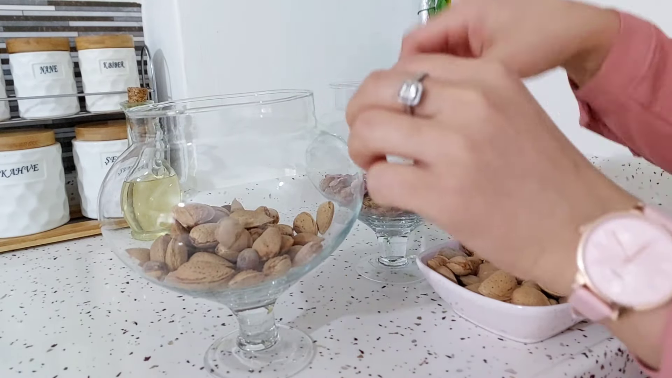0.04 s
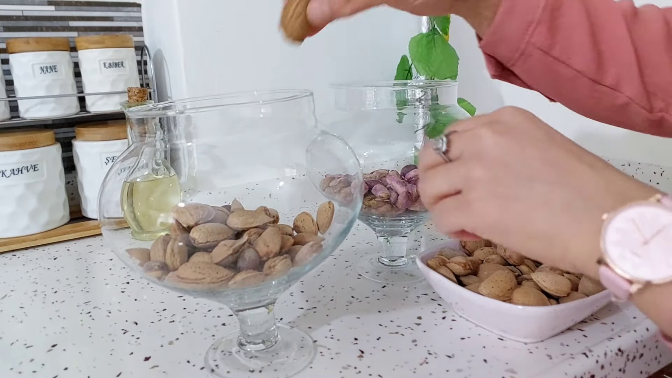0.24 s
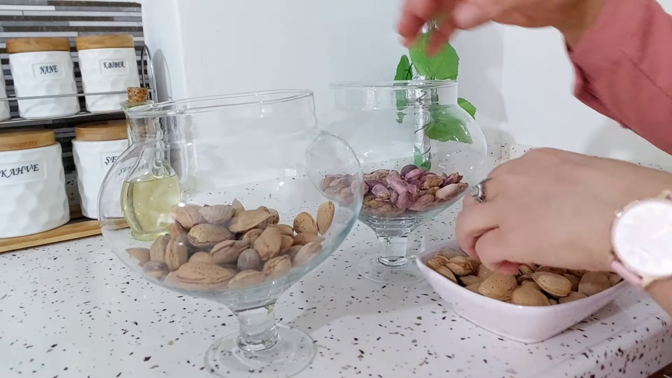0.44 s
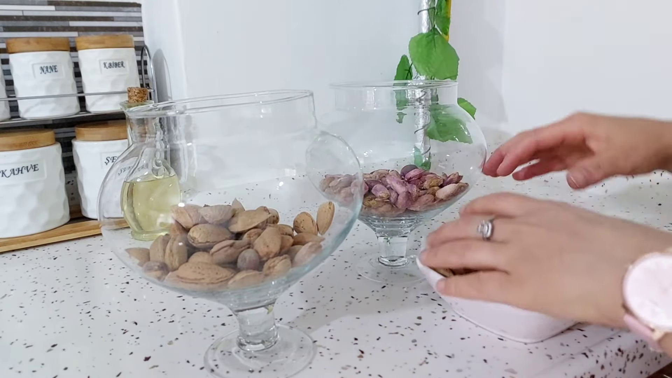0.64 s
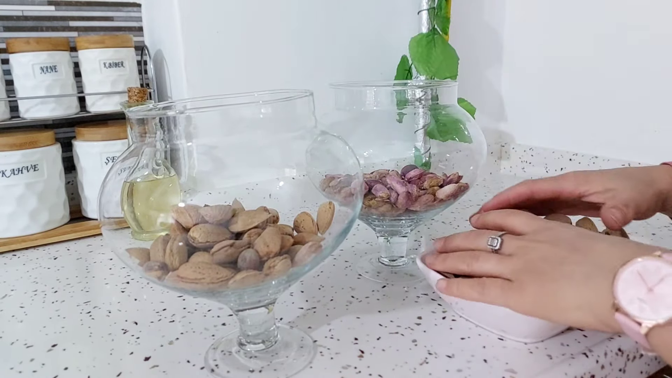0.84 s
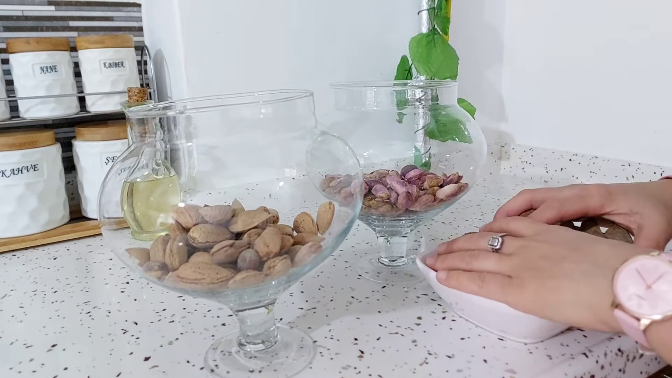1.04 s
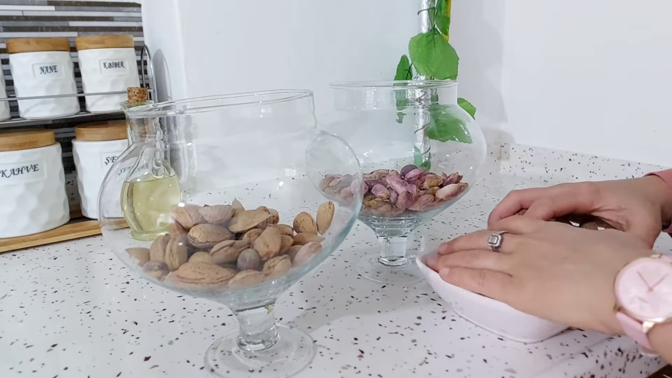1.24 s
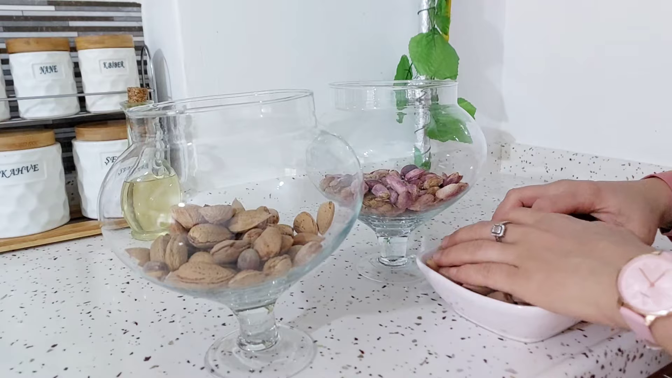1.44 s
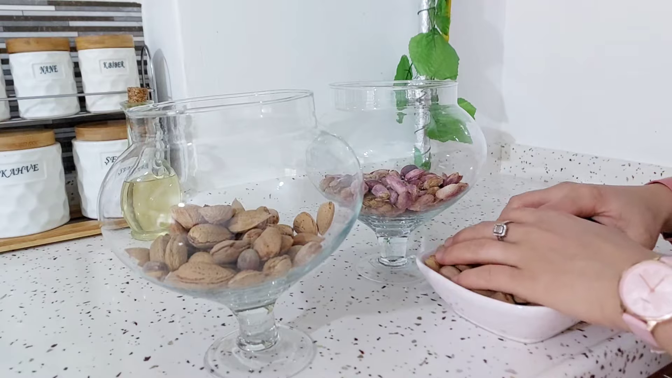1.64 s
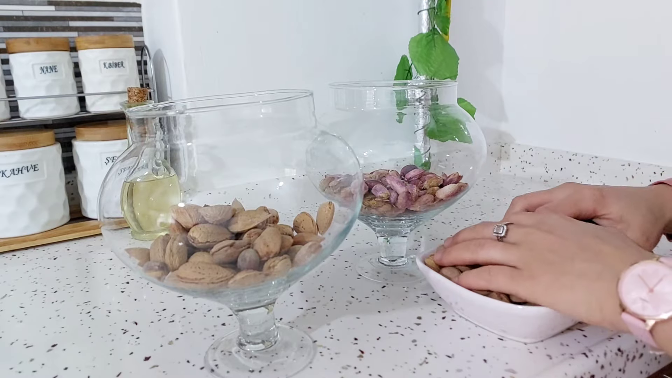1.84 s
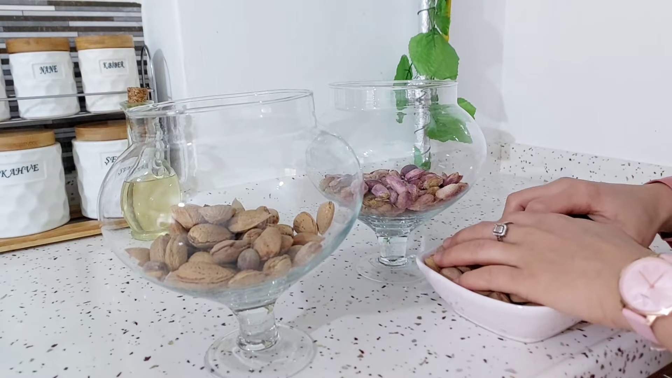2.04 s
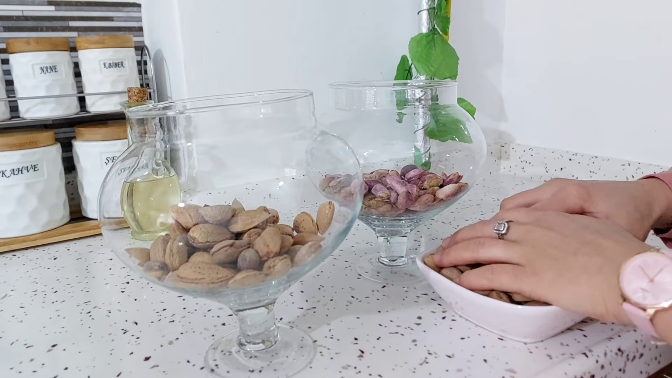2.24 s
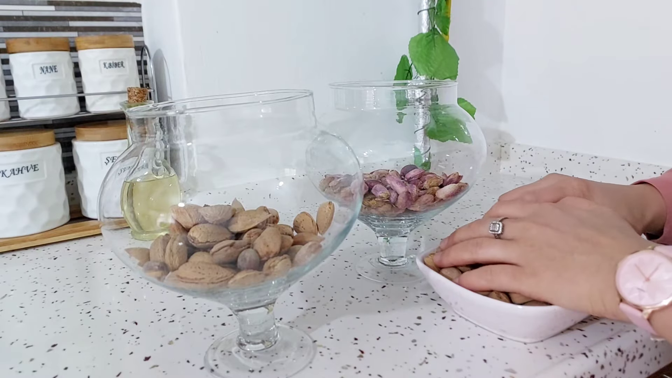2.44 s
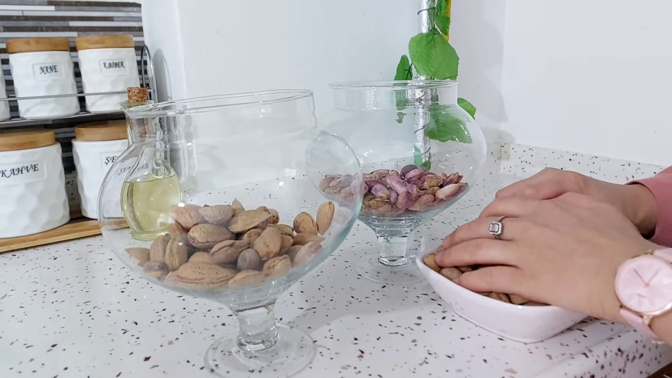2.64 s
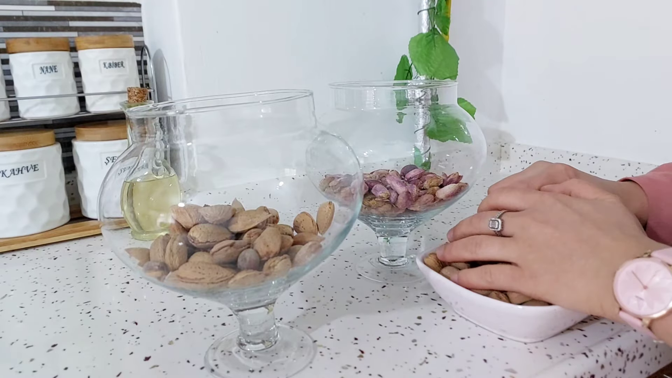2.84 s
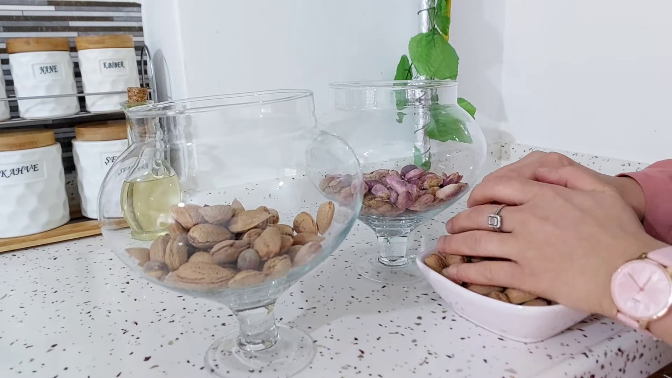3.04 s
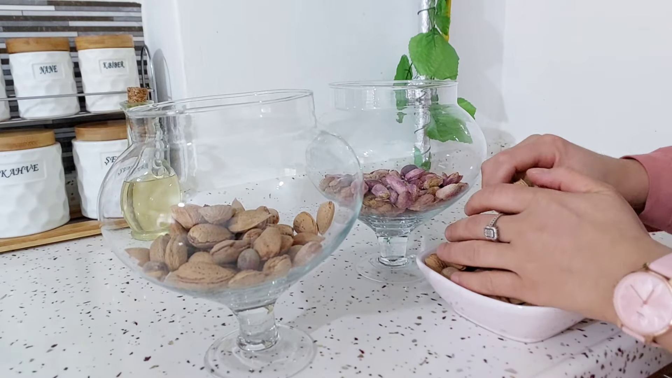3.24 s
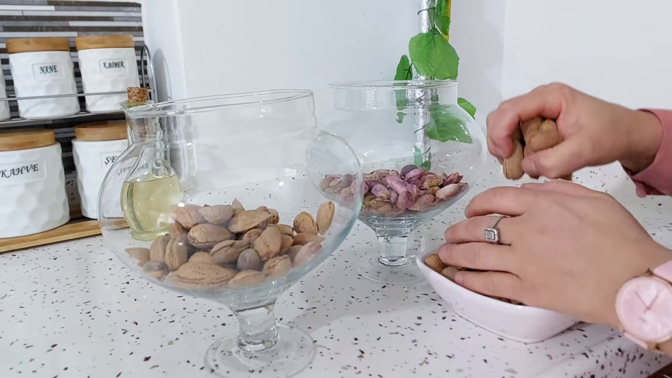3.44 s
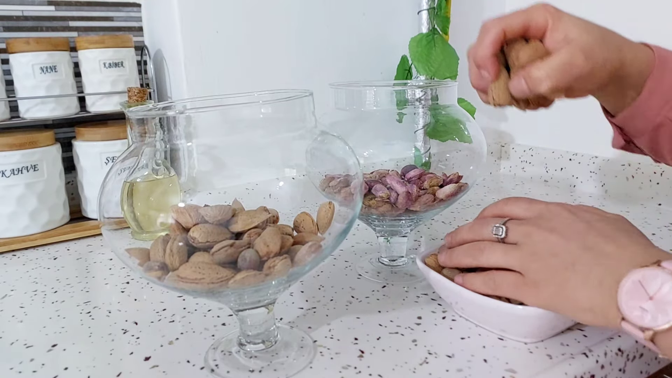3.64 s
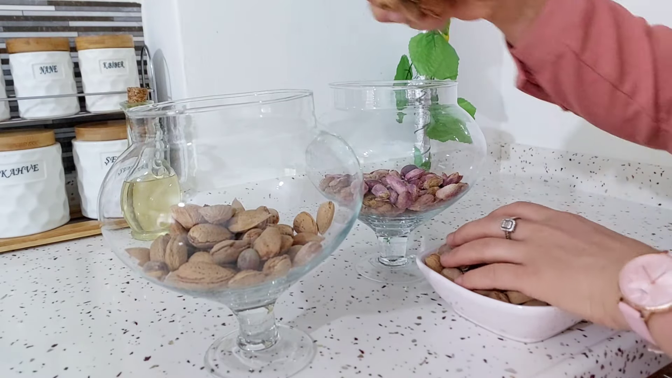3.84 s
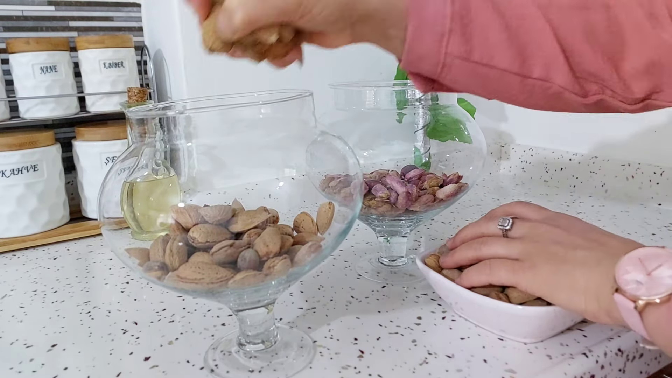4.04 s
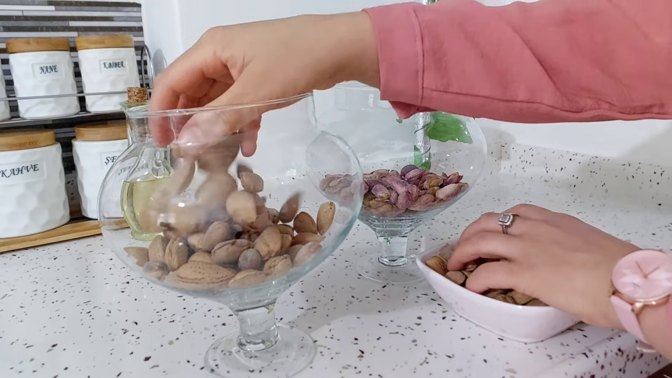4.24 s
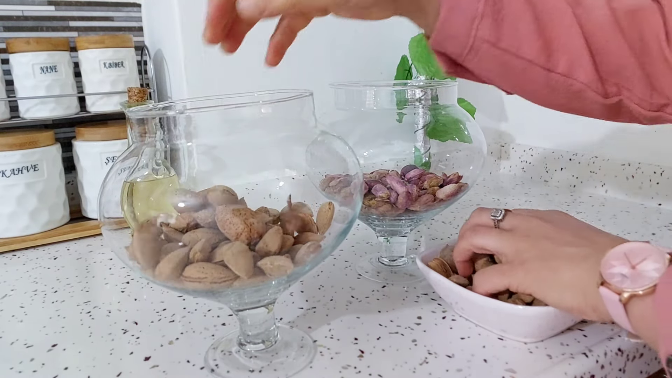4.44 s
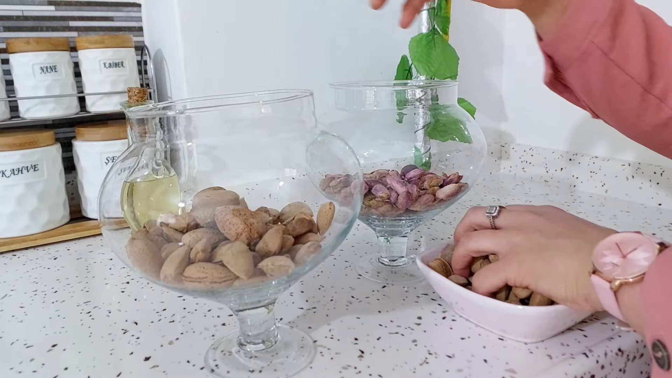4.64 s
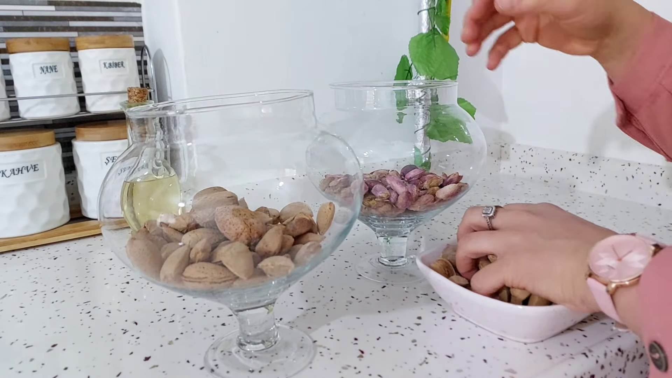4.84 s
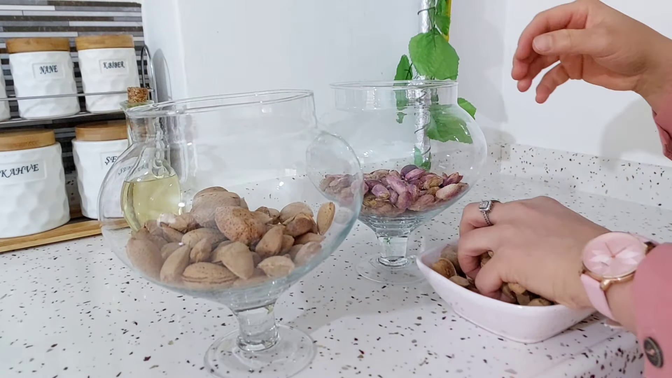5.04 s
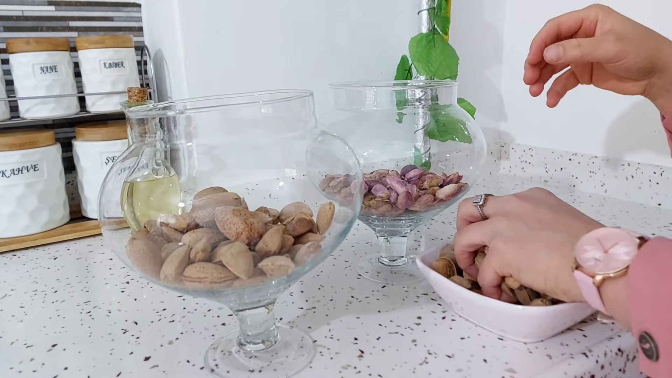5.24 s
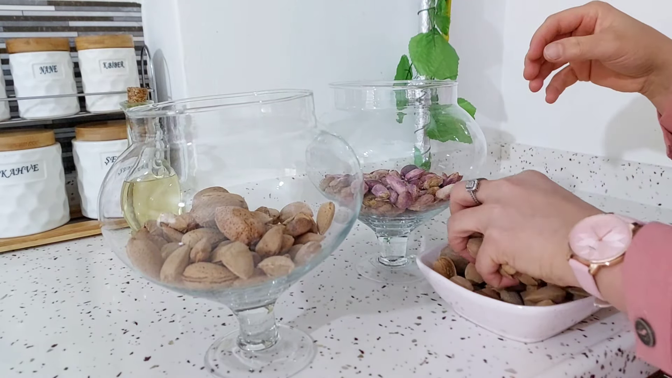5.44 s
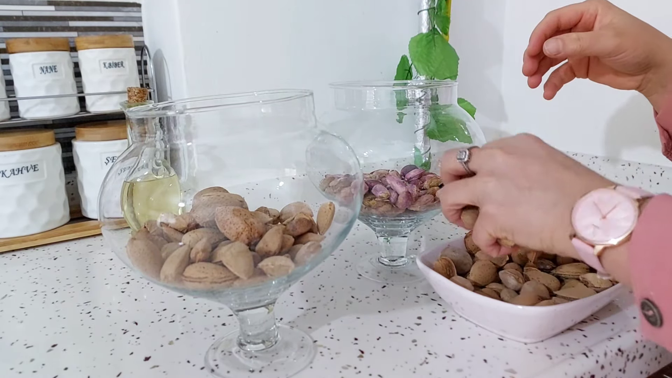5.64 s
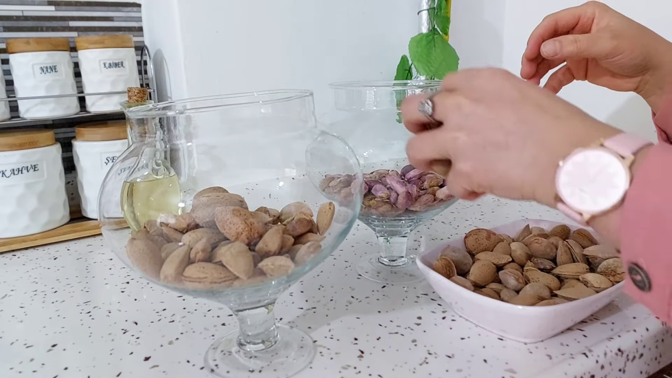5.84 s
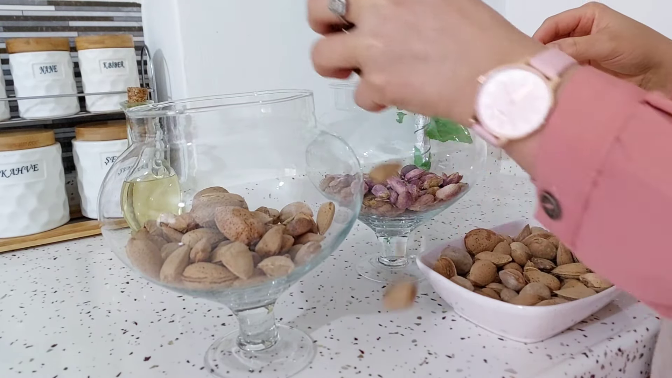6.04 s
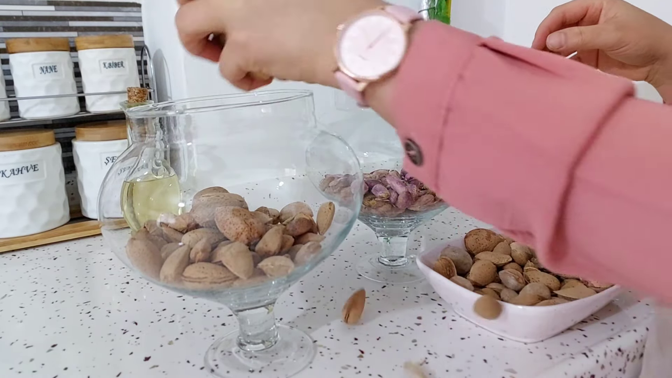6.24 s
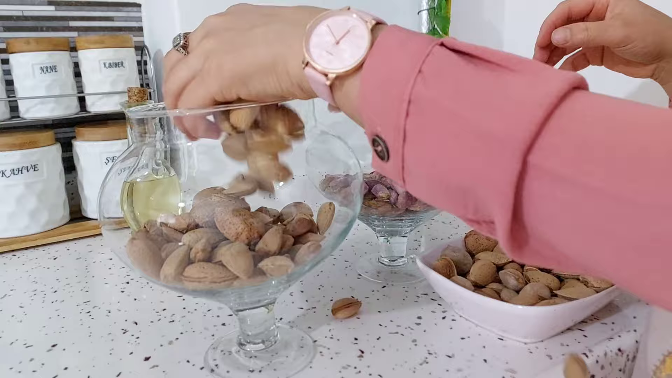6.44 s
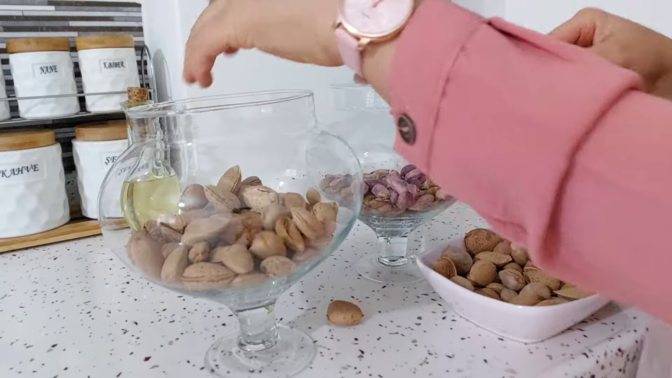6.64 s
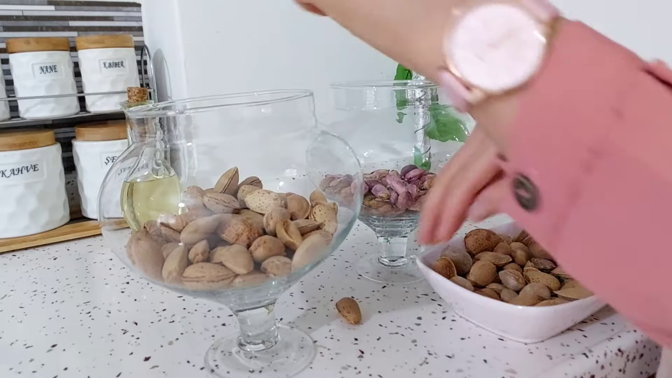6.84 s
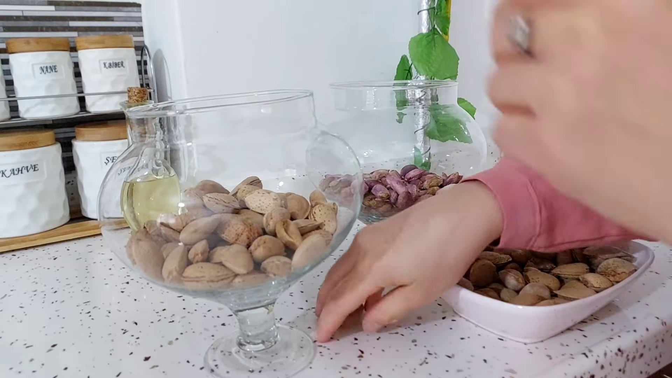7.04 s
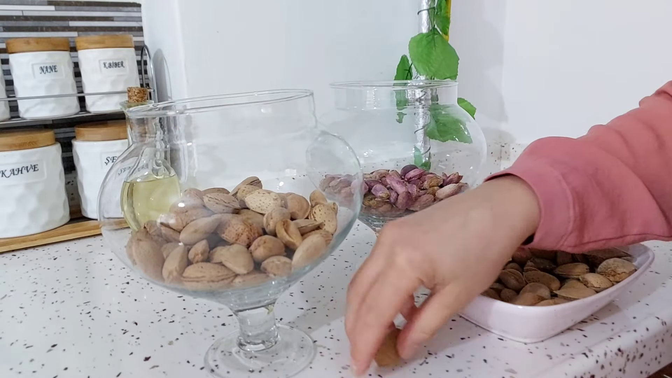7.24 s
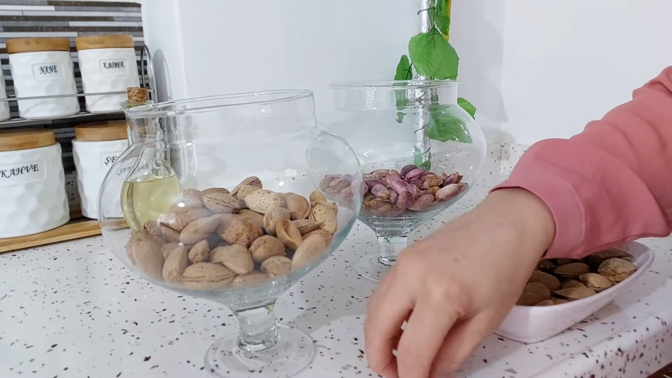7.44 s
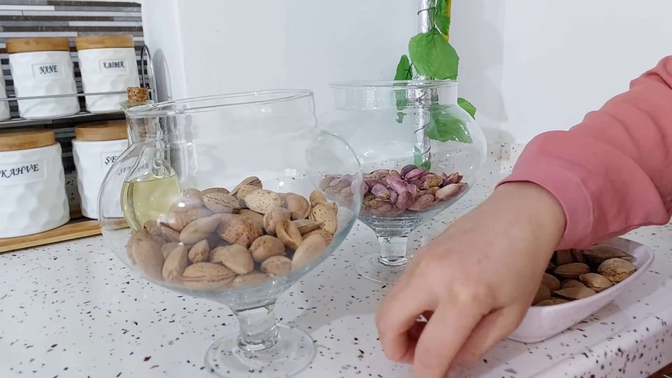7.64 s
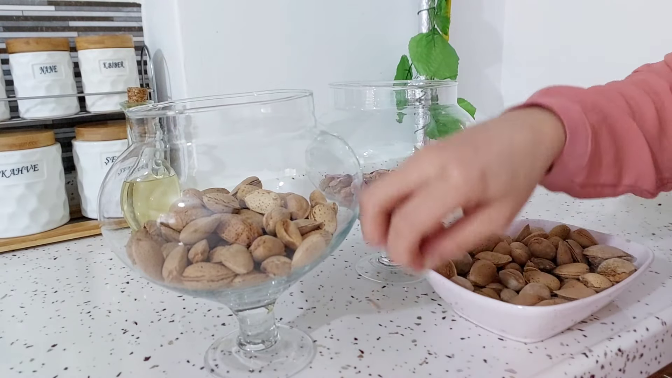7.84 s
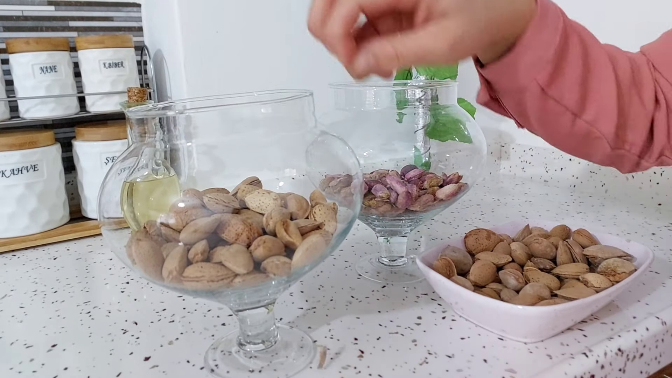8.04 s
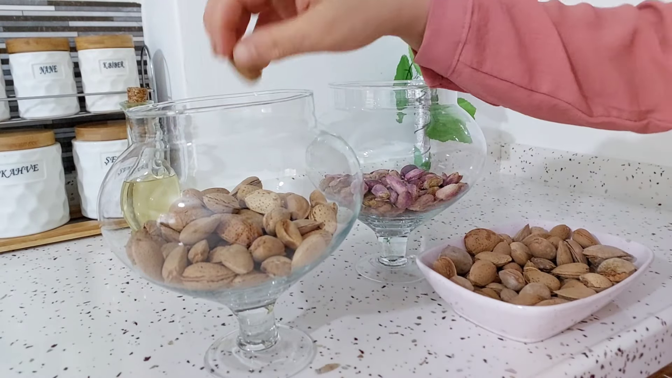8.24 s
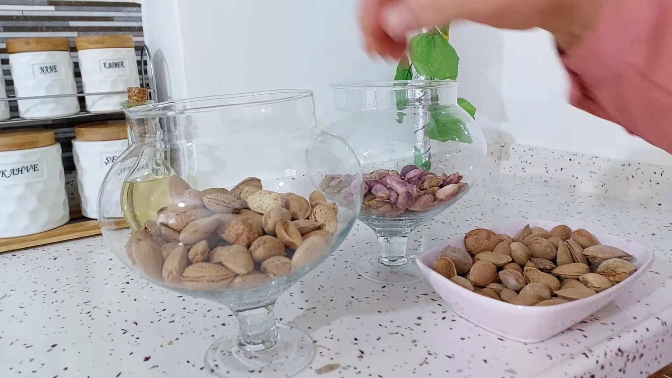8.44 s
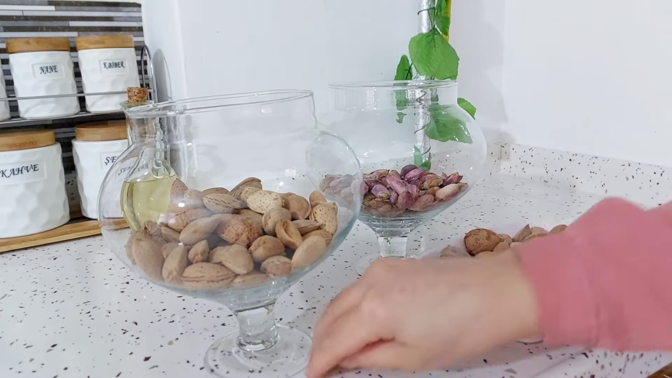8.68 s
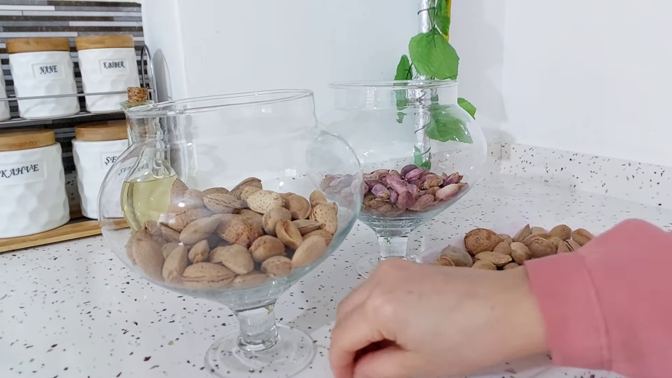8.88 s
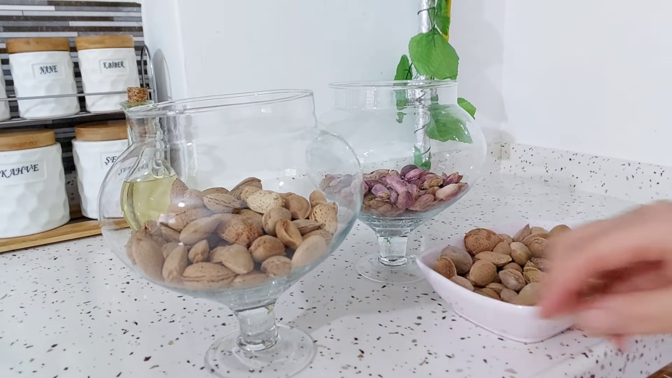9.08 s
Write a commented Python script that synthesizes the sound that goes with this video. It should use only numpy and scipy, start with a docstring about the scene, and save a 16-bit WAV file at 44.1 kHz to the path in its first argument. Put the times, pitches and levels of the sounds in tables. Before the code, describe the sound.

A quiet small kitchen, heard closely in stereo, with low rumble, a faint wavering appliance hum and short bright echoes. At about 0.4 s two almonds click onto the heap in a glass jar with a hollow thud. From 0.8 to 3.5 s a hand softly stirs a china bowl: grainy rustling, small slips, woody knocks near 1.6 and 2.5 s, slight china ringing. At 4.2 s a handful rushes into the jar, clattering, thudding and clinking for about half a second. Light rummaging returns from 4.8 to 5.7 s. At 6.0 s glass clinks and strays crack on stone; a shorter pour lands at 6.5 s, with sharp dry bounces, strongest around 6.8 s, thinning until 7.4 s. Faint ticks and a soft hand bump near 7.9 s precede a few almonds dropping at 8.35 s, a bright glass clink at 8.5 s, and a faint sleeve swish around 8.8 s.

```python
"""Almonds in their shells drop by the handful on a heap in a footed glass jar: clicks over the jar's hollow thuds.
Shells clink on the glass, which sings in dying modes; strays crack and bounce on the stone counter and the floor.
In a china bowl a hand grinds, knocks and slips the almonds, and the china rings. A palm, a sleeve and soft bumps
are shaped noise. A small kitchen answers with echoes and a tail, over low rumble and a wavering hum."""
import sys
import numpy as np
from scipy import signal
from scipy.fft import rfft, irfft
from scipy.io import wavfile

SR = 44100
rng = np.random.default_rng(int(sys.argv[2]) if len(sys.argv) > 2 else 0)


def waveform_to_disk(signal):
    """Save audio, clipped to [-1, 1], as 16-bit WAV at the path in sys.argv[1]."""
    frames = np.transpose(np.atleast_2d(signal))
    scaled = np.clip(frames, -1, 1) * 32767
    samples = np.round(scaled).astype(np.int16)
    wavfile.write(sys.argv[1], SR, samples)


N = 401751
JAR_LAG, BOWL_LAG = -6, 5  # samples by which the left microphone hears each place later

# colour of shell on shell: f/Hz, level/dB
SHELL_COLOUR = [(100, -21.5), (400, 0), (2500, -5.5), (5500, -3), (8300, -12), (11000, -8.5), (16000, -14)]
# handfuls let go over the jar: first contact t/s, build-up/s, rattle level before trims/dB, heap shifting/s
POURS = [(4.211, 0.012, -34, 0.5), (6.48, 0.078, -36, 0.15)]


def heap(settle_db=-6, rumble_db=-5, off_pitch_db=-8, hollow_db=-5, clatter_db=-7, shell_hz=4600):
    """Almonds land on almonds: shells click and ring, and the loaded jar gives a hollow thud."""
    # almonds landing on the heap: t/s, shell click level/dB, thud level/dB, thud pitch f/Hz
    landings = [(0.1515, -60.5, -48.5, 500), (0.3932, -35.5, -31.5, 530), (0.397, -40, -35.5, 308),
                (4.2155, -41, -34, 347), (4.2325, -32, -26, 378), (4.2425, -32, -42, 383),
                (4.3126, -31.5, -38, 398), (4.3317, -35.5, -28.5, 647), (4.378, -28, -45.5, 445),
                (4.445, -34.5, -36, 493), (4.5016, -37, -37, 660), (6.556, -52, -29.5, 444),
                (6.612, -37, -34, 308), (8.3445, -47, -34, 497), (8.3682, -41.5, -38, 308),
                (8.734, -55.5, -55.5, 473)]
    # modes of the almond-filled jar: f/Hz, level/dB, t60/s
    jar_modes = [(141, -3, 0.044), (307.3, -0.5, 0.09), (383.7, 0.5, 0.055), (446, 6, 0.042),
                 (483, 6.5, 0.042), (644.5, -5.5, 0.12), (751.6, -7, 0.069), (1284, -14.5, 0.19)]
    shells, thuds = np.zeros((2, N)), np.zeros((2, N))
    shell = colour(SHELL_COLOUR)
    for s, shell_db, thud_db, hz in landings:
        # the modes within half an octave of the thud's pitch are favoured
        blow = [(hz / np.sqrt(2), off_pitch_db), (hz, 0), (hz * np.sqrt(2), off_pitch_db)]
        snap = click(shell, JAR_LAG, snap_s=0.00058, rattle_s=0.011, rattle_db=-1.0)
        add(shells, s, amp(shell_db) * snap)
        add(shells, s, amp(shell_db + hollow_db) * ring(husk(shell_hz), JAR_LAG, detune=0.2))
        add(thuds, s, amp(thud_db) * ring(jar_modes, JAR_LAG, detune=0.02, tilt=blow))
    rattle = pouring() * grains(530, 11.0, JAR_LAG)
    body = ring(jar_modes, JAR_LAG)
    shells += amp(settle_db) * convolve(rattle, shell)  # the crowd of smaller contacts
    shells += amp(clatter_db) * pouring() * clatter(husk(shell_hz), 200, JAR_LAG, 0.25)
    thuds += amp(rumble_db) * convolve(rattle[:1], body / np.linalg.norm(body[0]))
    return kitchen(shells, near_db=-6.0, tail_db=-3.5) + kitchen(thuds, near_db=-28, tail_db=-4.0)


def pouring():
    """How hard the heap rattles: each handful rushes in, then the pile shifts more quietly and comes to rest."""
    fall_db_per_s = 146.5
    shift_db, shift_release_s = -58.5, 0.017
    fall_s = 20 / np.log(10) / fall_db_per_s
    total = 0
    for s, rise, db, shifting in POURS:
        rush = amp(db) * held(s, rise, rise, fall_s)
        total = total + rush + amp(shift_db) * held(s, rise, shifting, shift_release_s)
    return total


def husk(hz):
    """The modes of a hard-struck hollow shell of the given pitch."""
    # shell modes: multiple of the shell's pitch, level/dB, t60/s
    shell_modes = [(.46, -7.5, 0.013), (0.998, 2.5, 0.0072), (1.45, -1, 0.0057)]
    return [(hz * ratio, db, t60) for ratio, db, t60 in shell_modes]


def clatter(modes, per_s, lag, detune):
    """Many shells knocking at random, each with its modes freshly detuned."""
    out = np.zeros((2, N))
    for when, force in rng.random((int(per_s * N / SR), 2)):
        add(out, when * N / SR, force ** 3 * ring(modes, lag, detune))  # mostly light knocks
    return evened(out)


def glass(tick_db=-3, wall_db=3):
    """A shell meets the bare jar wall: a bright tick, and the glass sings, beating against a close twin note."""
    # almonds striking the wall: t/s, tick and high-mode level/dB, low-mode level/dB, singing note level/dB
    clinks = [(4.399, -27.5, -36, -34.5), (4.439, -30, -44, -62), (4.514, -40, -46, -60),
              (6.024, -32.5, -40, -32), (6.107, -35, -52, -64), (6.615, -44, -44, -45),
              (6.765, -41, -47, -53), (8.483, -39, -47, -56), (8.499, -28, -34.5, -53)]
    # modes of the bare glass: f/Hz, level/dB, t60/s
    glass_modes = [(657, 0, .27), (1285, -16, .2), (2060, -18, .5), (2065, 0, .58), (3920, -13, .14),
                   (4032, -18, .16), (4160, -17, .16), (4673, -21, .2), (5900, -18, .12)]
    # shells skidding on the glass: t/s, length/s, level/dB
    skids = [(4.279, 0.056, -44), (8.355, 0.1, -54.5)]
    # the jar's crowded upper modes: each contact wakes a different few
    upper_hz, upper_db, upper_t60_s = (8570, 13800), -17, 0.16
    ticks, rings = np.zeros((2, N)), np.zeros((2, N))
    tick = colour([(2500, -12.0), (7500, -10), (9000, -8.0), (16000, -10.5)])
    for s, high_db, low_db, note_db in clinks:
        blow = [(2060, low_db), (2065, note_db), (4000, high_db + wall_db), (4700, high_db)]
        snap = click(tick, JAR_LAG, snap_s=0.00048, rattle_s=0.005, rattle_db=-15)
        add(ticks, s, amp(high_db + tick_db) * snap)
        upper = [(hz, upper_db, upper_t60_s) for hz in rng.uniform(*upper_hz, size=14)]
        add(rings, s, ring(glass_modes + upper, JAR_LAG, tilt=blow))
    rings += sum(skid(*row) for row in skids)
    return kitchen(ticks, near_db=1, tail_db=-5.5) + kitchen(rings, near_db=-17, tail_db=-21)


def skid(start, length, db):
    """A shell judders along the glass: a rough squeak whose pitch rises and falls with its speed."""
    squeak_hz, arch, judder_hz = 2780, 0.055, 110  # resting pitch, fractional rise, cutoff of the roughness
    along = np.clip((np.arange(N) / SR - start) / length, 0, 1)
    pitch = squeak_hz * (1 + arch * np.sin(np.pi * along))
    turn = 2 * np.pi * np.cumsum(pitch) / SR
    lowpass = signal.butter(2, judder_hz, fs=SR, output="sos")
    judder = signal.sosfilt(lowpass, rng.standard_normal((2, N)))
    return amp(db) * held(start, length / 10, length, length / 10) * evened(judder * np.sin(turn))


def strays():
    """Stray almonds crack drily on stone; each hollow shell rings briefly at its own pitch."""
    # bounces on stone and tile: t/s, crack level/dB, low knock level/dB, top level/dB, shell pitch f/Hz
    bounces = [(6.107, -34, -20, -28.5, 7600), (6.1996, -33.5, -29.5, -34.5, 5030),
               (6.205, -35, -19.5, -40, 1240), (6.3887, -47, -20.5, -42, 794),
               (6.422, -41.5, -31.5, -42, 2650), (6.484, -36, -32, -50.5, 1870),
               (6.8071, -34.5, -24, -29.5, 2100), (6.8149, -27, -23, -32.5, 2220),
               (6.8246, -20, -35.5, -27.5, 5600), (6.8505, -42, -36, -35, 5940),
               (6.9939, -27.5, -23.5, -35, 2020), (7.0614, -28, -23.5, -23.5, 2730),
               (7.211, -34, -27, -40, 4560)]
    # light ticks of a shell on the counter: t/s, level/dB
    light_ticks = [(6.116, -29), (6.671, -41), (7.069, -35), (7.2406, -41), (7.414, -53), (7.807, -40)]
    # colour of shell on stone: f/Hz, level/dB
    stone = [(80, -16), (220, 2.5), (550, 1.5), (800, 1), (5500, 10), (8500, 2), (11000, 3), (16000, 1)]
    cracks, ticks = np.zeros((2, N)), np.zeros((2, N))
    for s, mid_db, low_db, high_db, hz in bounces:
        upper = [(4000, mid_db), (12000, high_db)]
        blow = [(1000, low_db)] + upper
        shell_blow = [(1000, low_db - 8)] + upper
        add(cracks, s, click(colour(stone, blow), BOWL_LAG, snap_s=0.0005, rattle_s=0.007, rattle_db=-17))
        add(cracks, s, amp(-4) * ring(husk(hz), BOWL_LAG, tilt=shell_blow))
    for s, db in light_ticks:
        bright = colour(stone, [(1000, -41.5), (10000, 6.5)])
        add(ticks, s, amp(db) * click(bright, BOWL_LAG, snap_s=0.00095, rattle_s=0.00095, rattle_db=-4.5))
    return kitchen(cracks, near_db=-1.1, tail_db=-0.59) + kitchen(ticks, near_db=-12.0, tail_db=-10.0)


def bowl(tap_db=-6, slip_ring_db=-3):
    """Shells grind, knock and slip under the hand, with scattered pitches; the china rings when struck."""
    # the hand stirring lightly: t/s, length/s, level before surges and trims/dB
    stirs = [(0.842, 2, -60), (4.763, 0.72, -61.5)]
    # fingers closing on almonds: tightest moment t/s, length/s, level before surges and trims/dB
    grabs = [(1.557, 0.2, -53.5), (1.688, 0.097, -50), (1.868, 0.1, -57.5), (2.328, 0.26, -53.5),
             (2.489, 0.08, -55), (3.003, 0.17, -53.5), (4.115, 0.97, -70), (5.04, 0.094, -55)]
    # almonds slipping against each other under the fingers: t/s, level/dB
    slips = [(0.869, -50), (1.349, -47), (1.965, -48), (2.4442, -46), (2.688, -45.5), (2.804, -47.5),
             (2.985, -40.5), (3.36, -53.5), (3.464, -53), (5.014, -51), (5.2, -54.5)]
    # hollow knocks of shell on shell: t/s, level before the tap trim/dB
    knocks = [(1.5694, -36.5), (1.673, -37), (2.5, -36.5), (4.957, -43), (5.037, -39), (5.336, -37.5)]
    # almonds ringing the china: t/s, level/dB, highest pitch reached by the contact f/Hz
    chinks = [(1.655, -38, 4600), (5.4, -47, 3450), (5.645, -35, 4200), (6.274, -28, 7000)]
    # a hollow shell knocked in the bowl: f/Hz, level/dB, t60/s
    nut = [(980, 3, 0.025), (1720, 0, 0.015), (3300, -1, 0.016)]
    # colour of the rustle: f/Hz, level/dB
    rustle = [(120, 1), (450, 6.5), (970, -1), (1400, -3.5), (3400, -9), (5200, -14.5), (9000, -26.5),
              (16000, -23)]
    stir_attack_s, stir_release_s = 0.0096, 0.16
    uneven_db, pushes_per_s = 2.2, 14  # the fingers push in small irregular surges
    rustle_db, knock_db, china_db = -1.5, -2.5, -17  # shares of grinding, hollow knocks and china
    light_top_hz = 3450  # light contacts reach only the china's lower modes

    motion = sum(amp(db) * held(s, stir_attack_s, length, stir_release_s) for s, length, db in stirs)
    motion = motion + sum(swell(*grab) for grab in grabs)
    pushes = rng.standard_normal(int(pushes_per_s * N / SR))
    surge = np.interp(np.arange(N), np.linspace(0, N, len(pushes)), pushes)
    motion = motion * amp(uneven_db * surge)
    grinding = motion * grains(380, 5, BOWL_LAG)
    shells = amp(rustle_db) * convolve(grinding, colour(rustle))
    shells += amp(knock_db) * motion * clatter(nut, 130, BOWL_LAG, 0.085)
    china = chink(light_top_hz)
    shells += amp(china_db) * convolve(grinding, china / np.linalg.norm(china[0]))

    slip = colour(rustle, [(300, -3.0), (4000, 11.0)])

    def contact():
        """A bright slip of shell on shell with a long, faint chatter."""
        return click(slip, BOWL_LAG, snap_s=0.00057, rattle_s=0.033, rattle_db=-14)

    for s, db in slips:
        add(shells, s, amp(db) * contact())
        add(shells, s, amp(db + slip_ring_db) * chink(light_top_hz))
    for s, db in knocks:
        add(shells, s, amp(db + tap_db) * ring(nut, BOWL_LAG, detune=0.05))
        add(shells, s, amp(db + 2 * tap_db) * contact())
    for s, db, hz in chinks:
        add(shells, s, amp(db) * chink(hz))
        add(shells, s, amp(db + tap_db) * convolve(contact(), colour([(1, 0)], reach(hz))))
    return kitchen(shells, near_db=-0.076, tail_db=-6.5)


def reach(top_hz):
    """A contact on china is strongest at its top pitch and excites little above it: f/Hz, level/dB."""
    return [(top_hz * 0.8, -2), (top_hz, 2), (top_hz * 1.12, -13)]


def chink(top_hz):
    """The china rings up to the pitch that the contact reaches."""
    # modes of the china bowl: f/Hz, level/dB, t60/s
    china_modes = [(2020, -9, .12), (2546, -15, .09), (2960, -9, .12), (3475, -10, .13), (4190, -14, .13),
                   (4570, -11, .11), (5850, -16, .1), (6450, -17, .07)]
    return ring(china_modes, BOWL_LAG, tilt=reach(top_hz))


def hand():
    """Shells slide off the opening palm in fine grains, a sleeve swishes and the hand bumps the counter."""
    # a sleeve brushing past: loudest moment t/s, length/s, level before its colour/dB
    sleeve = (8.81, 0.45, -72.5)
    # colour of the cloth: f/Hz, level/dB
    cloth = [(2500, -22), (4500, 4.5), (16000, 6)]
    # soft bumps of the hand on the counter: t/s, level/dB
    bumps = [(7.046, -48), (7.943, -44.5)]
    # colour of a soft bump: f/Hz, level/dB
    bump = [(50, -14), (130, -5), (500, -7.5), (1100, -26.5), (2200, -40.5)]
    drop_s = 0.12  # the palm opens this long before the first contact in the jar
    palm_db, attack_s, release_s = -53.5, 0.015, 0.071
    opening = sum(held(s - drop_s, attack_s, attack_s, release_s) for s, *_ in POURS)
    sliding = convolve(grains(970, 3.0, JAR_LAG), colour(SHELL_COLOUR, [(1500, 4), (5500, -3.0)]))
    out = amp(palm_db) * opening * sliding
    out += swell(*sleeve) * convolve(rng.standard_normal((2, N)), colour(cloth))
    for s, db in bumps:
        thump = click(colour(bump), BOWL_LAG, snap_s=0.048, rattle_s=0.031, rattle_db=0, size=16384)
        add(out, s, amp(db) * thump)
    return kitchen(out, near_db=-0.068, tail_db=-4)


def ambience():
    """Low room rumble from coloured noise, and an appliance hum of sines whose phases waver."""
    # colour of the room noise: f/Hz, level/dB
    air_colour = [(30, 6), (48, -17), (110, -10), (350, -19), (1200, -42), (3000, -50)]
    # partials of the hum: f/Hz, level/dB
    hum_partials = [(65, -66.5), (100, -67), (125, -69)]
    air_db = -59.5
    hz, t = np.fft.rfftfreq(N, 1 / SR), np.arange(N) / SR
    z = rfft(rng.standard_normal((2, N)))
    same = np.clip(read([(40, 0.95), (300, 0.85), (2000, 0.23)], hz), 0, 1)  # likeness of the two sides
    z[1] = same * z[0] + np.sqrt(1 - same ** 2) * z[1]
    low_cut = hz / np.hypot(hz, 15)
    air = evened(irfft(z * amp(read(air_colour, hz)) * low_cut, N))
    knots = np.linspace(0, t[-1], 40)
    hum = 0
    for f, db in hum_partials:
        waver = np.interp(t, knots, rng.standard_normal(len(knots)))
        hum = hum + amp(db) * np.sin(2 * np.pi * f * t + waver)
    return amp(air_db) * air + hum


def kitchen(x, near_db, tail_db):
    """Quick echoes from counter, wall and cupboards, then the room's tail, which dies sooner in the treble."""
    # decay of the room: f/Hz, t60/s
    decay_times = [(150, 0.87), (4000, 0.39), (16000, 0.18)]
    t = np.arange(SR) / SR
    taps = rng.standard_normal((2, len(t)))
    hz, at, z = signal.stft(taps, SR)
    same = 1 / (1 + (hz[:, None] / 800) ** 2)  # long waves reach both microphones alike
    z[1] = same * z[0] + np.sqrt(1 - same ** 2) * z[1]
    near = signal.istft(z)[1][:, :SR] * np.exp(-t / 0.0043) * (t > 0.002)
    fading = amp(-60 * at / read(decay_times, hz)[:, None])
    tail = np.roll(signal.istft(z * fading)[1][:, :SR], 400, axis=1)  # starts 400 samples late
    echoes = amp(near_db) * evened(near) + amp(tail_db) * evened(tail)
    return x + convolve(x, echoes / np.sqrt(SR))


def click(response, lag, snap_s, rattle_s, rattle_db, size=4096):
    """A contact as decaying noise: a snap and an added chatter."""
    t = np.arange(size) / SR
    shape = np.exp(-t / snap_s) + amp(rattle_db) * np.exp(-t / rattle_s)
    burst = pair(rng.standard_normal((3, size)) * shape, lag)
    return convolve(10 * evened(burst) / np.sqrt(size), response)


def ring(modes, lag, detune=0, tilt=((1, 0),)):
    """Dying modes; each contact point favours other ones and radiates differently to each side."""
    hz, db, t60 = np.transpose(modes)[:, :, None]
    t = np.arange(int(t60.max() * SR)) / SR
    strength, shift, side = rng.standard_normal((3, len(hz), 1))
    decay = amp(db + read(tilt, hz) + strength - 60 * t / t60)
    flip = np.pi * np.arange(len(hz))[:, None]  # neighbouring modes start in opposition, so close pairs swell
    turn = 2 * np.pi * hz * (1 + detune * shift) * t + flip
    spread = np.pi * hz * lag / SR + side * np.minimum(hz / 8000, 1)
    return np.array([(decay * np.sin(turn + k * spread)).sum(0) for k in (-1, 1)])


def grains(per_s, spread_db, lag):
    """Many tiny contacts, a few of them large, each a brief scrape of decaying noise."""
    levels = amp(spread_db * np.minimum(rng.exponential(1, N), 3))
    sizes = levels * (rng.random(N) < per_s / SR)
    fade = np.exp(-1 / (0.00085 * SR))
    power = signal.lfilter([1], [1, -fade], sizes ** 2 + 1e-9)
    return evened(pair(np.sqrt(power) * rng.standard_normal((3, N)), lag))


def swell(middle, length, db):
    """A movement that grows and fades in one smooth arch."""
    phase = np.clip((np.arange(N) / SR - middle) / length, -0.5, 0.5)
    return amp(db) * np.cos(np.pi * phase)


def held(start, attack_s, length, release_s):
    """Envelope: a straight rise, a hold until length, an exponential release."""
    t = np.arange(N) / SR - start
    return np.clip(t / attack_s, 0, 1) * np.exp(-np.maximum(t - length, 0) / release_s)


def colour(spectrum, tilt=((1, 0), (2, 0)), size=2048):
    """Causal (minimum-phase) response of unit energy with the given spectrum, then tilted."""
    hz = abs(np.fft.fftfreq(size, 1 / SR))
    gain = evened(amp(read(spectrum, hz))) * amp(read(tilt, hz))
    log_response = np.conj(signal.hilbert(np.log(gain + 1e-7)))
    return np.fft.ifft(np.exp(log_response)).real[:size // 2]


def pair(x, lag, apart=0.4):
    """Three rows to two microphones: one shared row, lag samples late on the left, and a share of their own."""
    apart = np.clip(apart, 0, 1)
    shared = [np.pad(x[0], (max(k, 0), 0))[:x.shape[1]] for k in (lag, -lag)]
    return np.sqrt(1 - apart) * np.array(shared) + np.sqrt(apart) * x[1:]


def convolve(x, response):
    """Filters both channels and keeps the length."""
    return signal.fftconvolve(x, np.atleast_2d(response), axes=1)[:, :x.shape[1]]


def add(mix, s, sound):
    """Mixes a stereo sound in at time s."""
    part = mix[:, round(s * SR):][:, :sound.shape[1]]
    part += sound[:, :part.shape[1]]


def read(points, hz):
    """Reads a table on a log-frequency axis."""
    f, value = np.transpose(points)
    return np.interp(np.log(hz + 1), np.log(f + 1), value)


def evened(x):
    """Scales to rms 1."""
    return x / np.sqrt(np.mean(x ** 2) + 1e-20)


def amp(db):
    """Decibels to gain."""
    return 10 ** (np.asarray(db) / 20)


def scene():
    """Jar, strays, bowl and hand over the room's rumble and hum."""
    return heap() + glass() + strays() + bowl() + hand() + ambience()


def record(dry):
    """The right microphone is a little brighter; then a steep lowpass limits the band."""
    edge_hz = 15950
    hz = np.fft.rfftfreq(N, 1 / SR)
    balance_db = read([(200, 0.5), (5000, 1.0), (10000, -1.6)], hz)  # left over right
    heard = irfft(rfft(dry) * amp(np.array([balance_db, -balance_db]) / 2), N)
    lowpass = signal.firwin(301, edge_hz, window=("kaiser", 9), fs=SR)
    return signal.oaconvolve(heard, lowpass[None], "same")


dry = scene()
out = record(dry)
waveform_to_disk(out)
```